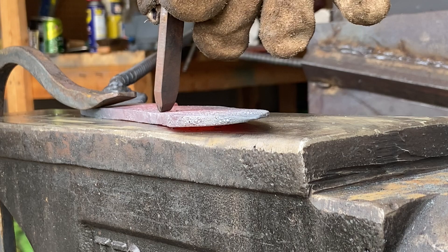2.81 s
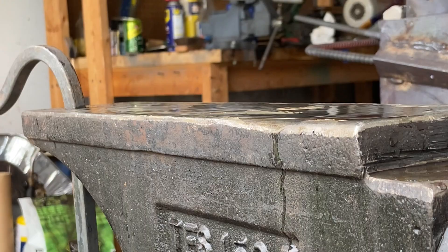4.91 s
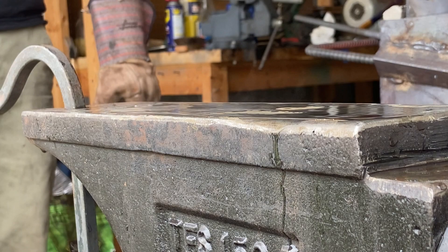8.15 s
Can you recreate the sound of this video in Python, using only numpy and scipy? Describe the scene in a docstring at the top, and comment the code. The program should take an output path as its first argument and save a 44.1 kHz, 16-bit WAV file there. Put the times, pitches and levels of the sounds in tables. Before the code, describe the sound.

A gas forge burns throughout with a steady low roar and a thin hiss, heard in a small workshop. About halfway, a hammer taps a chisel and then drives it into hot steel on an anvil, two quick, sharp, ringing blows close by. The sound cuts out for an instant with a tick, and the hiss is softer afterwards. Near the end, steel tongs rattle and clank down.

```python
"""A gas forge roars throughout in a small workshop: the flame drives low chamber and room resonances,
the gas jet hisses; the hiss puffs once early and throbs. At 4.4 s a hammer taps a chisel, then drives it
into hot steel on the anvil; a limiter ducks the roar after each loud blow. Near 5 s the sound cuts out
briefly with a tick in a wash of noise; after that the background has quieter hiss and less boom.
Steel slides faintly on steel now and then. From 9.3 s tongs rattle and clank down."""
import sys
import numpy as np
from scipy import signal
from scipy.fft import rfft, irfft
from scipy.io import wavfile
from scipy.ndimage import uniform_filter1d, minimum_filter1d

SR = 44100
rng = np.random.default_rng(int(sys.argv[2]) if len(sys.argv) > 2 else 0)


def output_pcm(signal):
    """Save a mono or channel-first signal as 16-bit PCM at the path in sys.argv[1].

    Samples are clipped to [-1, 1] before scaling.
    """
    pcm = np.clip(np.atleast_2d(signal).T, -1, 1) * 32767
    wavfile.write(sys.argv[1], SR, np.round(pcm).astype(np.int16))


N = 434385
TIME_S = np.arange(N) / SR
FREQ_HZ = np.maximum(np.fft.rfftfreq(N, 1 / SR), 1)

# Table levels are relative.
# chamber and room resonances: centre_hz, width_hz, level_db
FORGE_MODES = [(60.5, 7, -6.5), (77, 10.4, -4), (98, 22, -5.5), (117, 20, -3.6), (134, 12, -9),
               (171, 14, -10.5), (230, 23, -2), (259, 16, 0), (276, 19, 0), (303, 26, -3.8), (343, 26, -2),
               (371, 35, 0.3), (396, 20, -10), (441, 34, -7.8), (492, 22, -19), (527, 41, -15.5),
               (597, 18, -19.5), (670.7, 38, -20), (820, 20, -22)]
# burner tube resonances: centre_hz, width_hz, lift_db
TUBE_MODES = [(960, 45, 4), (1085, 30, 3.5), (1180, 90, -2), (1300, 42, 2.8), (1480, 200, -3),
              (1680, 50, 3), (2070, 21, -4), (2250, 52, 2.5), (2880, 120, 2.5), (5230, 490, 2.5),
              (7000, 300, 4)]
# turbulent flame rush: freq_hz, level_db
RUSH_SPECTRUM = [(20, -38), (45, -1), (400, 10.5), (620, 3.5), (950, -3.5), (1500, -8), (2100, -13.5),
                 (2700, -19), (3800, -23.5), (6200, -25), (7600, -27.5), (10800, -22.5), (12000, -28),
                 (13600, -17.5), (14300, -24), (15000, -48)]
# gas jet hiss: freq_hz, level_db
JET_SPECTRUM = [(2400, -25), (3200, -5), (4200, -1), (5300, -1), (6300, 2), (7000, 0), (7700, -9),
                (14200, -22), (15000, -42)]
# one early puff of hiss, then a brief wash of noise around the cut-out: peak_s, level_db
BROAD_SWELLS = [(0.29, -53), (4.962, -46)]
# burner stereo width: freq_hz, side_minus_mid_db
BURNER_WIDTH = [(60, -32), (130, -8.5), (200, -20.5), (380, -7.5), (700, -2), (1300, -6.5), (2200, -6.5),
                (3200, -44), (6000, -44), (7600, -66), (15000, -31)]

# hammer blows: start_s, crack_db, chatter_s, tilt_db_per_octave, chisel_db, anvil_db, room_db
BLOWS = [(4.3740, 0, 0.0044, 0, -8, -25, -2), (4.6402, 1, 0.0055, -1.5, -30, 3, -7)]
# hammer crack, steel on steel: freq_hz, level_db
HAMMER_CRACK = [(100, 0), (400, 4), (650, -2), (1300, -2.5), (2000, 1), (3700, 2), (5500, 0), (6800, 4.5),
                (9000, -3.5), (10700, 2.5), (12500, -5), (14000, -2), (15500, -13)]
# chisel ring: pitch_hz, level_db, t60_s
CHISEL_MODES = [(560, -6, .08), (690, -5, .09), (1130, -7, .06), (1669, 4, .11), (2078, -5, .07),
                (2500, -3, .035), (2980, -2, .03), (3600, 3, .025), (4021, 3, .04), (4829, -6, .1),
                (5889, -6, .1), (6035, -5, .13), (6433, -8, .15), (6720, -6, .12), (6997, 2, .03),
                (8096, -3, .13), (10550, -7, .16), (11600, -7, .11), (12580, -13, .14), (13960, -9, .12)]
# anvil ring: pitch_hz, level_db, t60_s
ANVIL_MODES = [(115, -3, .07), (264, -1, .13), (345, 1, .07), (435, 1, .11), (540, -5, .08), (680, -8, .05),
               (837, -8, .14), (944, 3, .03), (1250, 0, .006), (1480, 8, .008), (2083, -20, .24),
               (2780, 1, .005), (3408, -18, .19), (4250, -6, .008), (4930, -21, .16), (5030, -16, .13),
               (5130, -17, .2), (6450, -4, .008)]

# tong knocks: start_s, crack_db, chatter_s, rein_db, scrape_db, scrape_hz
TONG_KNOCKS = [(9.305, -39, 0.0032, -27.5, -43, 4480), (9.345, -47, 0.026, -50, -51, 3500),
               (9.391, -38, 0.0025, -36.5, -39, 3550), (9.4842, -1.5, 0.0031, -22.5, -13.5, 4640),
               (9.529, -36, 0.008, -42, -35, 5100), (9.578, -41, 0.015, -46, -39, 2350),
               (9.797, -40.5, 0.012, -39, -48, 4400), (9.821, -39, 0.003, -32.5, -48, 3500)]
# tong crack, steel on steel: freq_hz, level_db
TONG_CRACK = [(200, -6), (1200, -10.5), (1800, 1), (3000, -6.5), (4600, 1.5), (6000, 1), (8000, -4),
              (10700, -4), (12000, -14), (14500, -11), (15500, -14)]
# ring of the tong jaws: pitch_hz, level_db, t60_s
JAW_MODES = [(2648, -19, .22), (3639, -19, .22), (4560, -15, .24), (5060, -17, .2), (5630, -14, .22),
             (6352, -13, .19), (7353, -17, .22), (8376, -14, .22), (9265, 1.5, .21), (10486, -17, .17),
             (12779, -14, .14), (12908, -12, .14), (14200, -20, .12)]
# ring of the tong reins (handles): pitch_hz, level_db, t60_s
REIN_MODES = [(850, 2, .045), (1690, 0.5, .035), (1860, -1, .018), (2140, 4, .07), (2380, -8, .015),
              (3400, -8, .012)]

# sliding steel: peak_s, squeal_db, rub_db
SLIDES = [(0.29, -60.5, -55), (5.4, -59, -55.5), (7.45, -63.5, -56), (7.75, -60.5, -63)]
# tool stereo width: freq_hz, side_minus_mid_db
TOOL_WIDTH = [(300, -11), (1500, -8), (3000, -16), (6000, -13), (8000, -12), (15000, -14)]
# workshop reverberation: freq_hz, t60_s
ROOM_T60 = [(300, 0.47), (1500, 0.28), (5000, 0.3), (8000, 0.25), (14000, 0.21)]

HISS_STEP_MID_S, HISS_STEP_LENGTH_S, HISS_STEP_DB = 5.02, 0.26, 7.5


def burner(roar_db=-21, sag_db_per_s=0.094, boom_step_db=2, rush_db=-35, jet_db=-56, flicker_db=1.4):
    """Turbulent burning rings the chamber; roar and rush surge together, the jet flickers on its own."""
    chamber = np.sqrt(sum((amp(db) * bell(hz, width_hz)) ** 2 for hz, width_hz, db in FORGE_MODES))
    tube_db = sum(db * bell(hz, width_hz) for hz, width_hz, db in TUBE_MODES)
    colour_db = tube_db + standing_waves_db()
    surge_db = 0.3 * wander(rate_hz=7.4)
    roar = noise(chamber, BURNER_WIDTH) * amp(roar_db - sag_db_per_s * TIME_S + surge_db)
    # after the cut-out: less boom, quieter hiss
    step = np.clip((TIME_S - HISS_STEP_MID_S) / HISS_STEP_LENGTH_S + .5, 0, 1)
    boom = irfft(rfft(roar) * bell(centre_hz=271, width_hz=92), N)
    roar -= boom * (1 - amp(-boom_step_db * step))
    rush = noise(amp(along(RUSH_SPECTRUM, FREQ_HZ) + colour_db), BURNER_WIDTH)
    rush *= amp(rush_db + surge_db)
    jet = noise(amp(along(JET_SPECTRUM, FREQ_HZ) + colour_db), BURNER_WIDTH)
    jet *= amp(jet_db - HISS_STEP_DB * step + flicker_db * wander(rate_hz=12))
    return roar + rush + jet


def hammering(gain_db=-0.5, clang_hz=5050, clang_re_anvil_db=-29.5):
    """The hammer rings chisel and anvil; the anvil's crowded upper modes merge into a clang."""
    blows = strikes(BLOWS, HAMMER_CRACK, CHISEL_MODES, ANVIL_MODES, crack_t60_s=0.007, rise_s=0.0023)
    clangs = [(start_s, anvil_db + clang_re_anvil_db, chatter_s, clang_hz)
              for start_s, _, chatter_s, _, _, anvil_db, _ in BLOWS]
    return amp(gain_db) * (blows + mode_cluster(clangs, width_hz=700, t60_s=0.38))


def tongs(room_db=-6):
    """Tongs rattle, scrape and clank down; a harder knock is brighter and rings the jaws more."""
    knocks, scrapes = [], []
    for start_s, crack_db, chatter_s, rein_db, scrape_db, scrape_hz in TONG_KNOCKS:
        tilt_db_per_octave = 1.3 + 0.23 * crack_db
        jaw_db = -11.5 + 1.4 * crack_db
        knocks.append((start_s, crack_db, chatter_s, tilt_db_per_octave, jaw_db, rein_db, room_db))
        scrapes.append((start_s, scrape_db, chatter_s, scrape_hz))
    clanks = strikes(knocks, TONG_CRACK, JAW_MODES, REIN_MODES, crack_t60_s=0.021, rise_s=0.0017)
    return clanks + mode_cluster(scrapes, width_hz=900, t60_s=0.03)


def strikes(events, crack_spectrum, modes_a, modes_b, crack_t60_s, rise_s, ring_send_db=-8):
    """Steel faces chatter briefly, two parts ring on, and the room answers crack and rings."""
    out, t = np.zeros((2, N)), np.arange(SR // 2) / SR
    walls = room(t, np.ones(len(FREQ_HZ)))
    octaves = np.log2(np.maximum(FREQ_HZ / 1000, 1))
    for start_s, crack_db, chatter_s, tilt_db_per_octave, a_db, b_db, room_db in events:
        decay_s = np.maximum(t - chatter_s, 0)  # decay starts when the chatter ends
        rise = 1 - np.exp(-t / rise_s)
        colour = amp(along(crack_spectrum, FREQ_HZ) + tilt_db_per_octave * octaves)
        crack = amp(crack_db) * noise(colour, TOOL_WIDTH, len(t)) * fade(decay_s, crack_t60_s) * rise
        rings = (amp(a_db) * ring(modes_a, t, decay_s) + amp(b_db) * ring(modes_b, t, decay_s)) * rise
        crack_echo = np.sqrt(np.sum(crack ** 2) / 2) * room(t, colour)
        ring_echo = amp(ring_send_db) * signal.fftconvolve(rings[:1], walls, axes=1)[:, :len(t)]
        add(out, start_s, crack + rings + amp(room_db) * (crack_echo + ring_echo))
    return out


def ring(modes, t, decay_s, split_ratio=0.0011):
    """Struck steel: each mode is a slowly beating pair, out of step between left and right."""
    out = 0
    for hz, db, t60_s in modes:
        skew_rad = np.arctan(amp(along(TOOL_WIDTH, hz))) * np.array([[1], [-1]])
        phase_cycles = rng.random()
        twin_hz = hz * (1 + split_ratio * rng.uniform(0.17, 0.77))
        tone = np.sin(2 * np.pi * (hz * t + phase_cycles) + skew_rad)
        twin = np.sin(2 * np.pi * (twin_hz * t + phase_cycles) + skew_rad)
        out += amp(db) * fade(decay_s, t60_s) * (tone + 0.65 * twin)
    return out / np.sqrt(sum(amp(db) ** 2 for _, db, _ in modes))


def mode_cluster(events, width_hz, t60_s):
    """Many close modes heard as one band, driven briefly, then dying away."""
    out, t = np.zeros((2, N)), np.arange(SR // 2) / SR
    for start_s, db, driven_s, centre_hz in events:
        band = noise(bell(centre_hz, width_hz) ** 2, TOOL_WIDTH, len(t))
        add(out, start_s, amp(db) * band * fade(np.maximum(t - driven_s, 0), t60_s))
    return out


def unsteady_hiss(first_s=0.24, period_s=0.604, throb_db=-57.5):
    """The hiss puffs once early and throbs evenly until the cut-out, which a wash of noise surrounds."""
    beats = [(peak_s, throb_db) for peak_s in np.arange(first_s, HISS_STEP_MID_S, period_s)]
    throbs = swell(beats, half_s=0.075, centre_hz=4570, width_hz=2000)
    return throbs + swell(BROAD_SWELLS, half_s=0.1, centre_hz=6960, width_hz=36000)


def sliding_steel(half_s=0.085, squeal_hz=5570, octave_db=-2):
    """Steel slides softly on steel: a low rub under a thin squeal and its smeared octave."""
    rubs = [(peak_s, db) for peak_s, _, db in SLIDES]
    squeals = [(peak_s, db) for peak_s, db, _ in SLIDES]
    rub = swell(rubs, half_s, centre_hz=1815, width_hz=110)
    squeal = swell(squeals, half_s, squeal_hz, width_hz=400)
    octave = swell(squeals, half_s, 2 * squeal_hz, width_hz=2400)
    return rub + squeal + amp(octave_db) * octave


def swell(events, half_s, centre_hz, width_hz):
    """A noise band rises and falls around each event, down to 1/e at half_s either side."""
    envelope = sum(amp(db) * np.exp(-((TIME_S - peak_s) / half_s) ** 2) for peak_s, db in events)
    return noise(bell(centre_hz, width_hz), BURNER_WIDTH) * envelope


def room(t, colour, build_s=0.00079):
    """Unit-energy workshop response to a sound of this colour: dense reflections, treble dying first."""
    spectrum = rfft(noise(colour, TOOL_WIDTH, len(t)))
    hz = np.maximum(np.fft.rfftfreq(len(t), 1 / SR), 1)
    tail = 0
    for centre_hz, t60_s in ROOM_T60:
        band_gain = along([(knot_hz, float(knot_hz == centre_hz)) for knot_hz, _ in ROOM_T60], hz)
        tail += irfft(spectrum * band_gain, len(t)) * fade(t, t60_s)
    tail *= 1 - np.exp(-t / build_s)
    return tail / np.sqrt(np.sum(tail ** 2) / 2)


def standing_waves_db(depth_db=2.95, spacing_hz=30.93):
    """Static ripple of the room's response over frequency, shallower below 1 kHz."""
    knots_hz = np.arange(0, SR / 2, spacing_hz)
    ripple = np.interp(FREQ_HZ, knots_hz, rng.standard_normal(len(knots_hz)))
    return depth_db * ripple * np.minimum(FREQ_HZ / 1000, 1)


def microphones(x, split_hz=6300, lead_s=0.000172):
    """Above the split, left turns steadily ahead of right in phase."""
    turn_rad = np.pi * lead_s * np.maximum(FREQ_HZ - split_hz, 0)
    return irfft(rfft(x) * np.exp(1j * np.array([turn_rad, -turn_rad])), N)


def limiter(x, ceiling_db=-9.5, hold_s=0.11, release_s=0.038):
    """Gain drops at once on a loud blow, holds, then recovers."""
    power = uniform_filter1d(np.mean(x ** 2, axis=0), SR // 250)
    level_db = 10 * np.log10(np.maximum(power, 1e-12))
    half_hold = int(hold_s * SR) // 2
    held_db = minimum_filter1d(np.minimum(ceiling_db - level_db, 0), 2 * half_hold + 1, origin=half_hold)
    pole = np.exp(-1 / (release_s * SR))
    released_db = signal.lfilter([1 - pole], [1, -pole], held_db)
    return x * amp(np.minimum(held_db, released_db))


def dropout(x, start_s=4.9793, silent_s=0.003, return_s=0.007, tick_db=-19, tick_s=0.001):
    """The sound cuts out with a tick and fades straight back."""
    t = TIME_S - start_s
    gate = np.interp(t, [-tick_s, 0, silent_s, silent_s + return_s], [1, 0, 0, 1])
    tick = amp(tick_db) * (t >= 0) * fade(np.maximum(t, 0), tick_s)
    return x * gate + tick


def noise(colour, stereo_width, size=N):
    """Stereo noise of rms 1; colour is gain over FREQ_HZ."""
    hz = np.maximum(np.fft.rfftfreq(size, 1 / SR), 1)
    mid, side = rfft(rng.standard_normal((2, size)))
    side_gain = amp(along(stereo_width, hz))
    pair = np.array([mid + side_gain * side, mid - side_gain * side]) / np.hypot(1, side_gain)
    return unit_rms(irfft(pair * np.interp(hz, FREQ_HZ, colour), size))


def wander(rate_hz):
    """Random steps smoothed twice, rms 1."""
    hold = int(SR / rate_hz)
    steps = np.repeat(rng.standard_normal(N // hold + 1), hold)
    return unit_rms(uniform_filter1d(uniform_filter1d(steps, hold), hold)[:N])


def bell(centre_hz, width_hz):
    """Resonance curve over FREQ_HZ, peak 1."""
    return 1 / (1 + (2 * (FREQ_HZ - centre_hz) / width_hz) ** 2)


def along(points, hz):
    """Interpolate (freq_hz, value) points in log frequency."""
    knots_hz, values = np.transpose(points)
    return np.interp(np.log(hz), np.log(knots_hz), values)


def fade(t, t60_s):
    """Exponential decay, 60 dB down at t60_s."""
    return np.exp(-np.log(1000) * t / t60_s)


def amp(db):
    """Decibels to gain."""
    return 10 ** (np.asarray(db) / 20)


def unit_rms(x):
    """Scale to rms 1."""
    return x / np.sqrt(np.mean(x ** 2))


def add(out, start_s, sound):
    """Mix a sound in at start_s."""
    i = int(start_s * SR)
    out[:, i:i + sound.shape[1]] += sound[:, :N - i]


def scene():
    """Forge and tools, summed in stereo."""
    return burner() + unsteady_hiss() + sliding_steel() + hammering() + tongs()


def record(dry, top_hz=15800):
    """Microphone pair, limiter, dropout, full-scale clip, low-pass."""
    sound = dropout(limiter(microphones(dry)))
    low_pass = signal.ellip(10, .2, 80, top_hz, fs=SR, output="sos")
    return signal.sosfilt(low_pass, np.clip(sound, -1, 1))


dry = scene()
out = record(dry)
output_pcm(out)
```